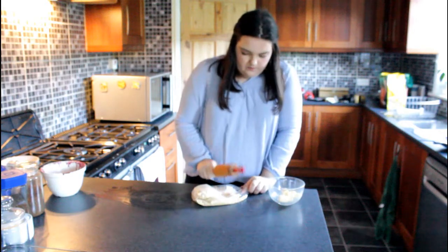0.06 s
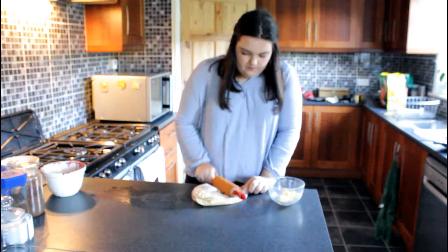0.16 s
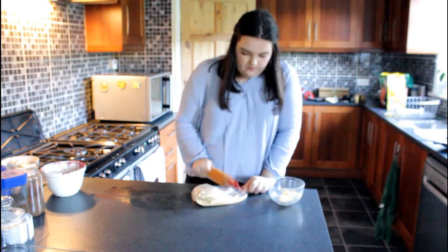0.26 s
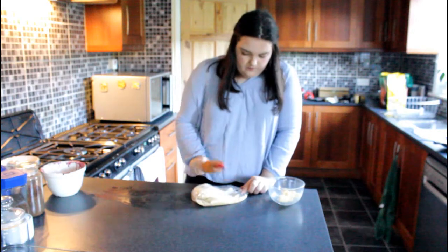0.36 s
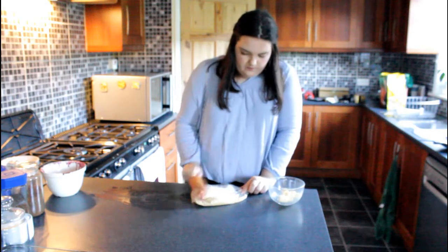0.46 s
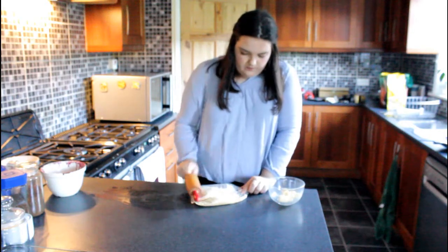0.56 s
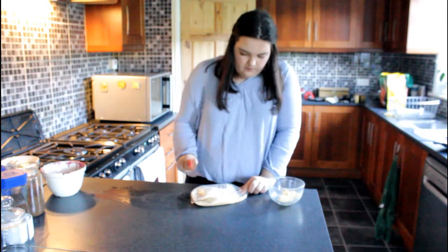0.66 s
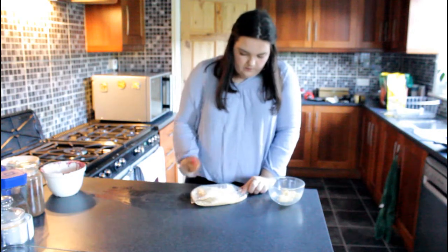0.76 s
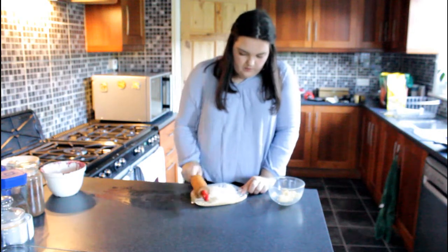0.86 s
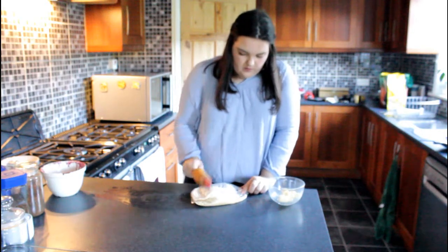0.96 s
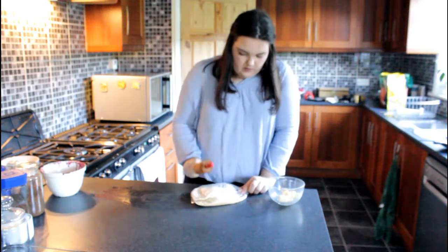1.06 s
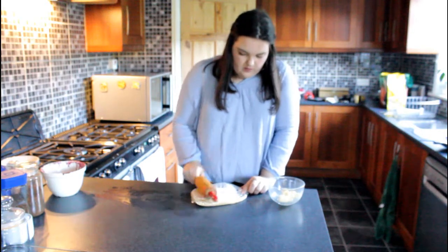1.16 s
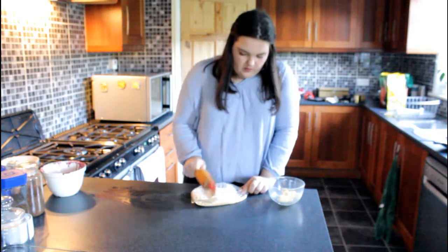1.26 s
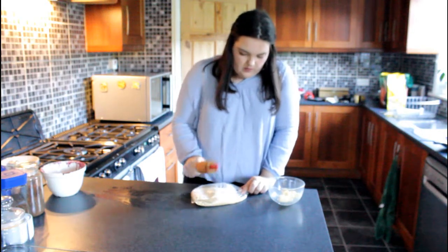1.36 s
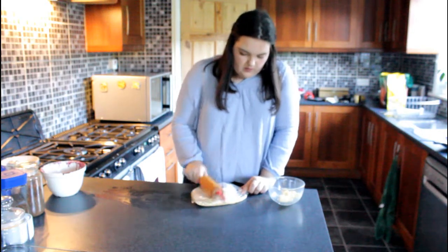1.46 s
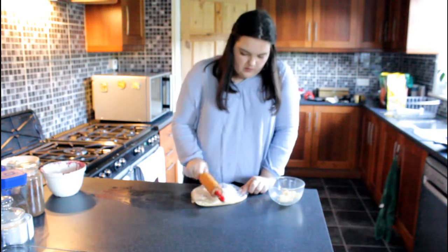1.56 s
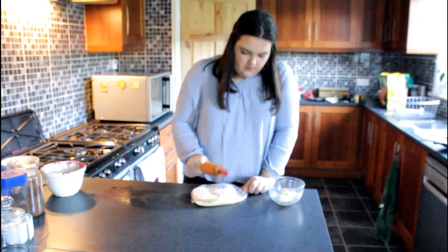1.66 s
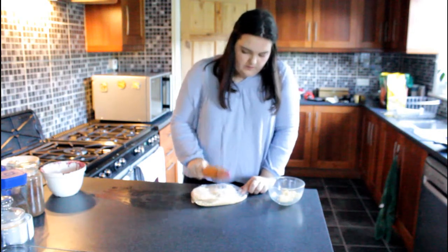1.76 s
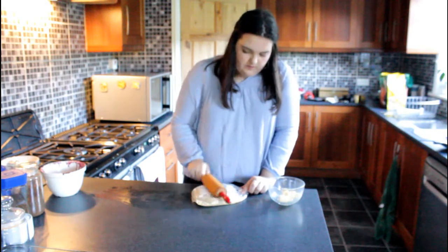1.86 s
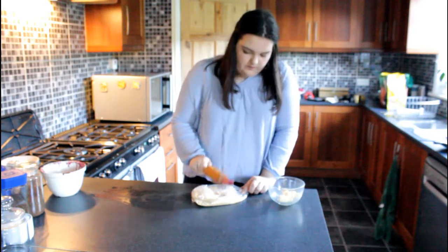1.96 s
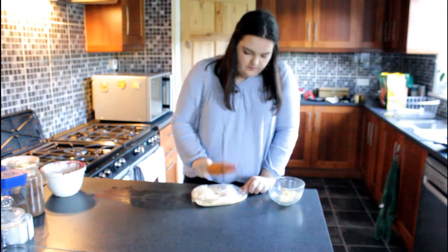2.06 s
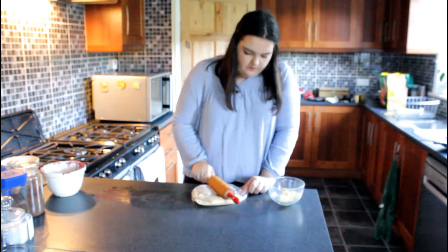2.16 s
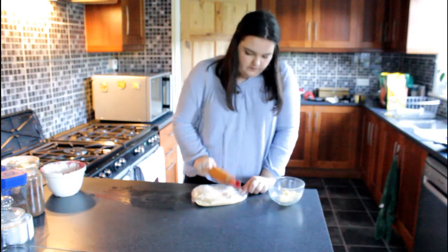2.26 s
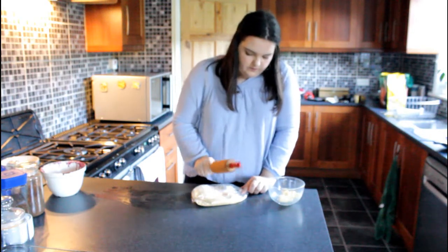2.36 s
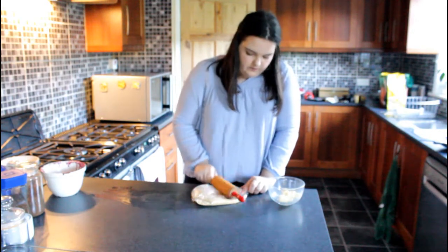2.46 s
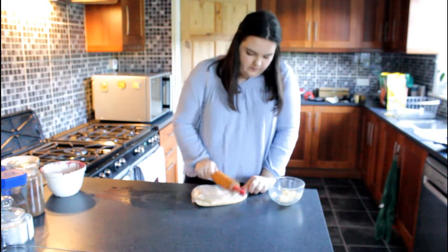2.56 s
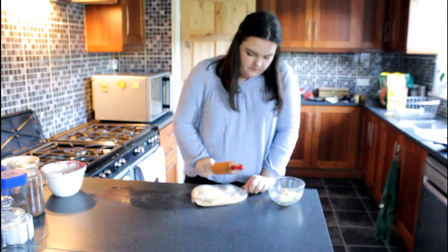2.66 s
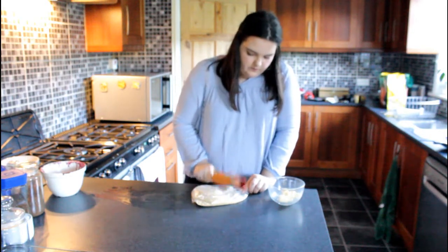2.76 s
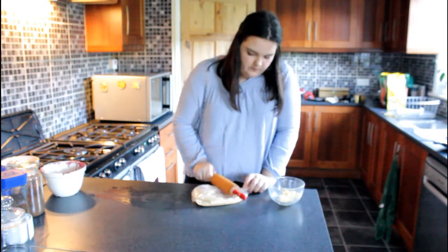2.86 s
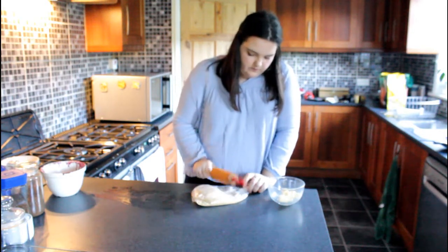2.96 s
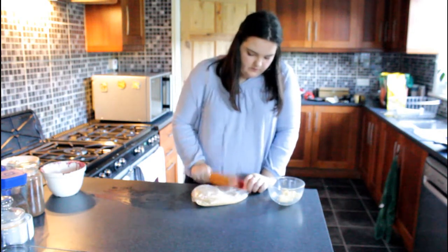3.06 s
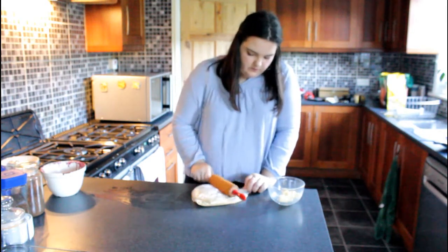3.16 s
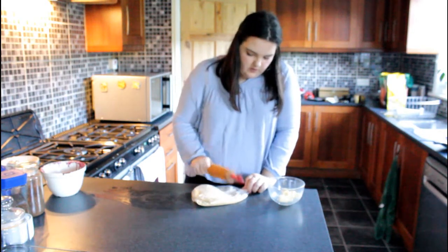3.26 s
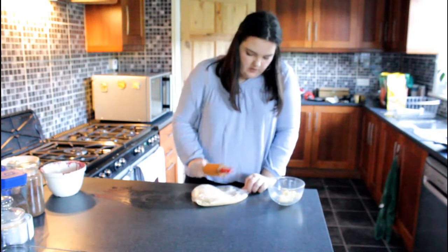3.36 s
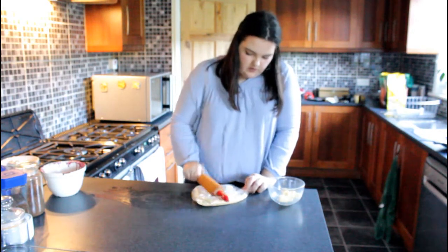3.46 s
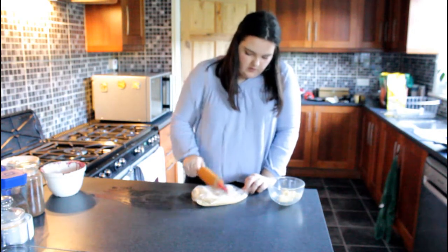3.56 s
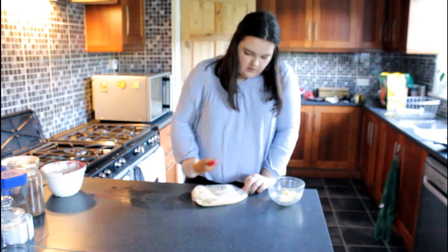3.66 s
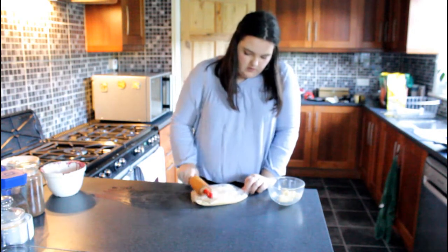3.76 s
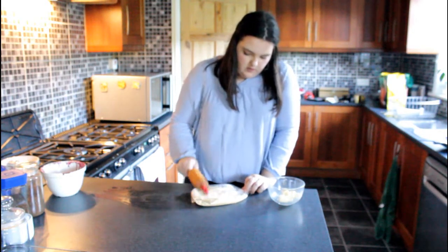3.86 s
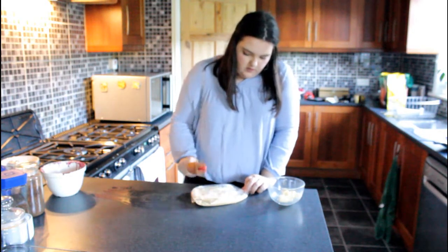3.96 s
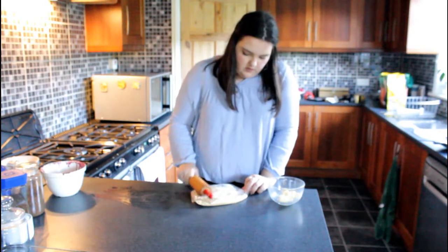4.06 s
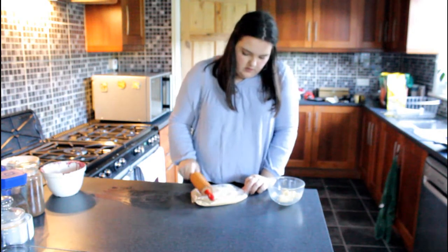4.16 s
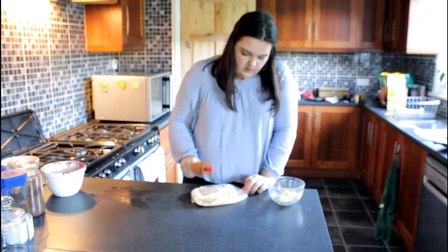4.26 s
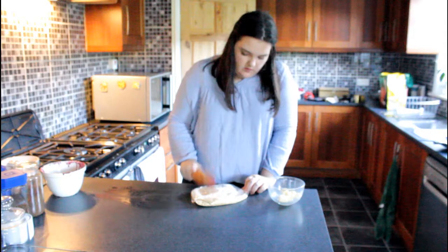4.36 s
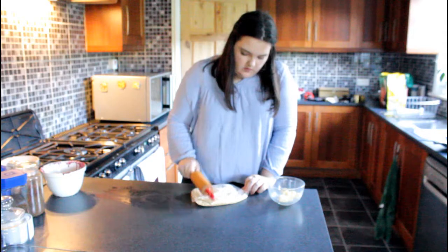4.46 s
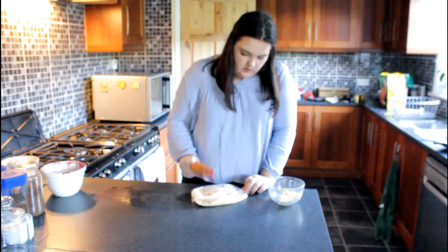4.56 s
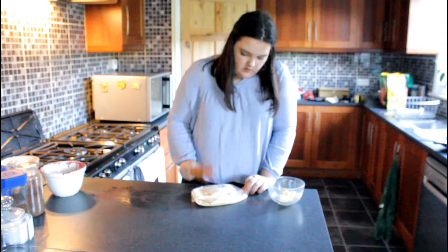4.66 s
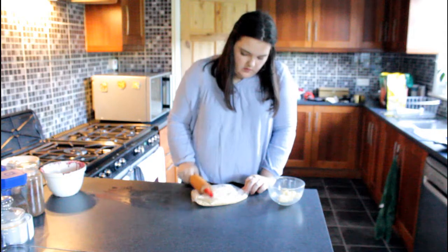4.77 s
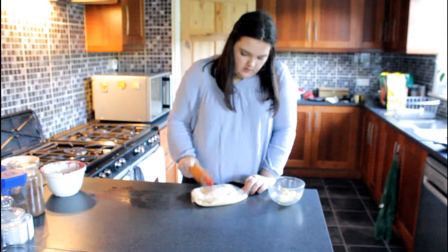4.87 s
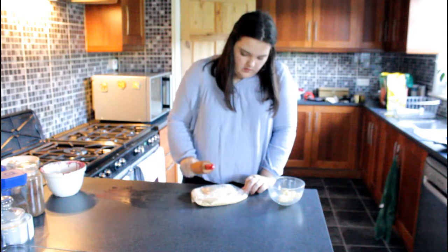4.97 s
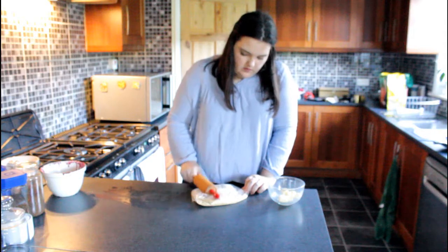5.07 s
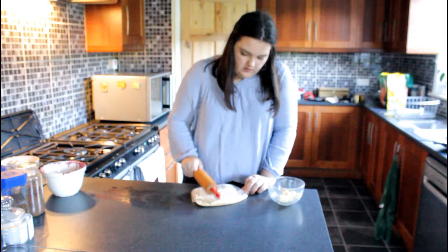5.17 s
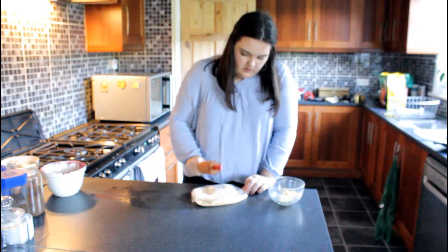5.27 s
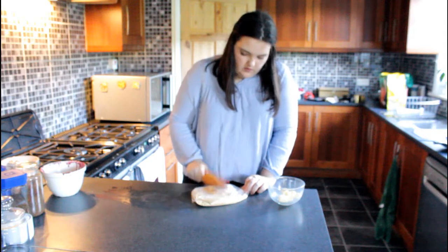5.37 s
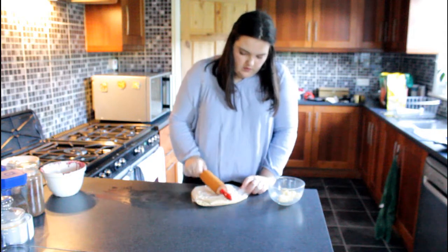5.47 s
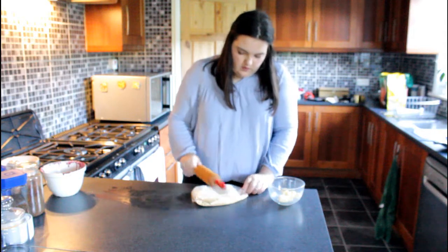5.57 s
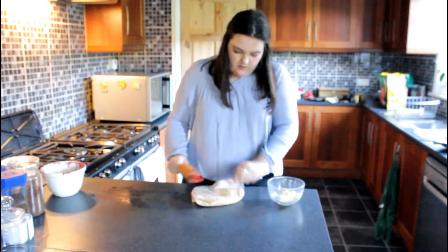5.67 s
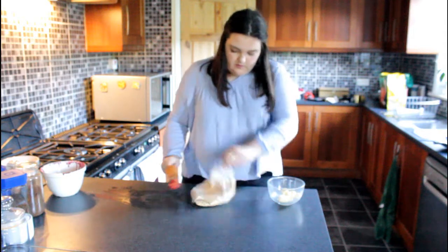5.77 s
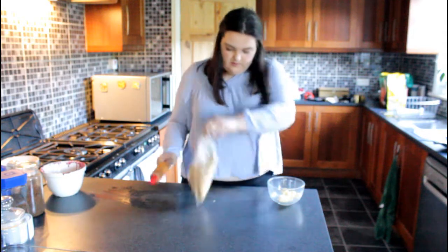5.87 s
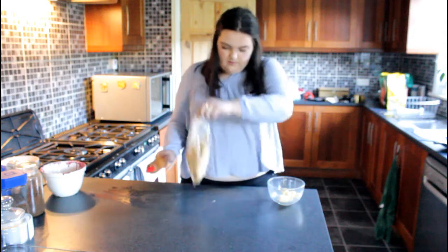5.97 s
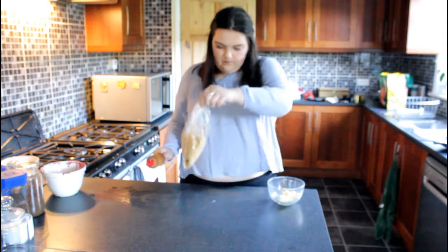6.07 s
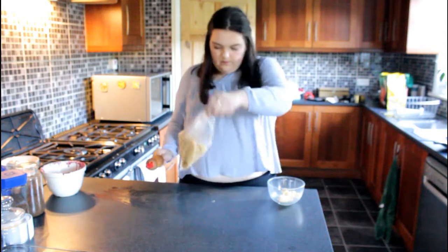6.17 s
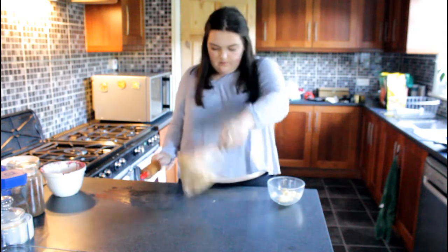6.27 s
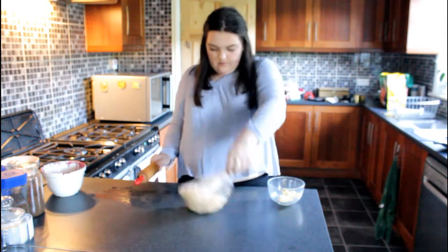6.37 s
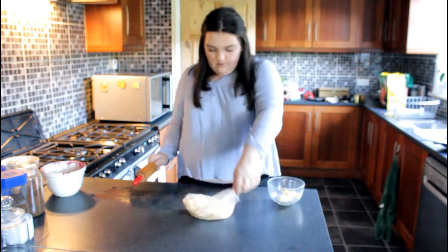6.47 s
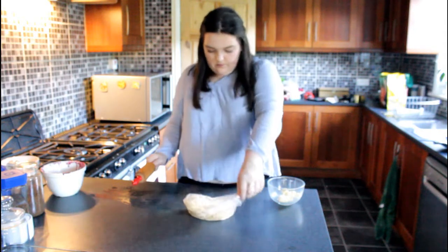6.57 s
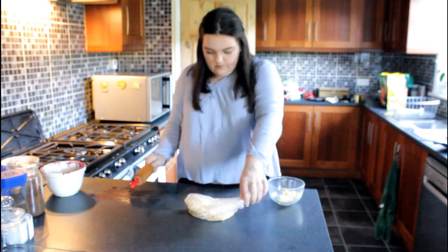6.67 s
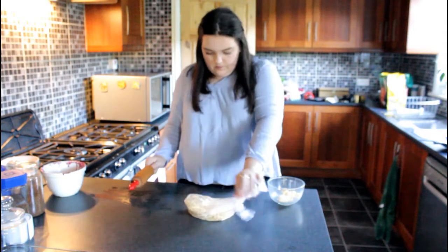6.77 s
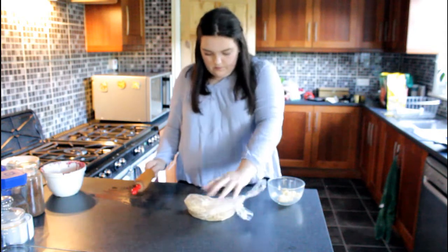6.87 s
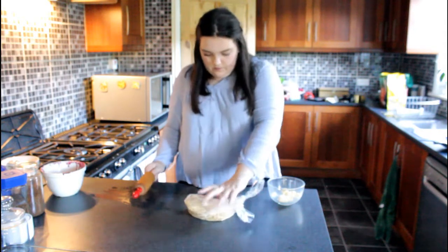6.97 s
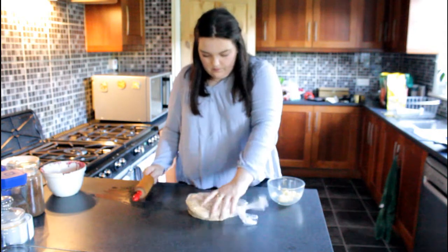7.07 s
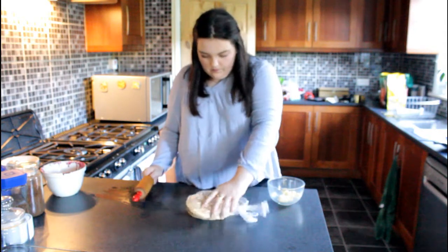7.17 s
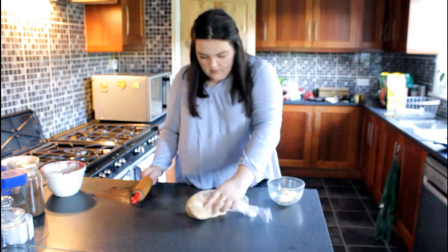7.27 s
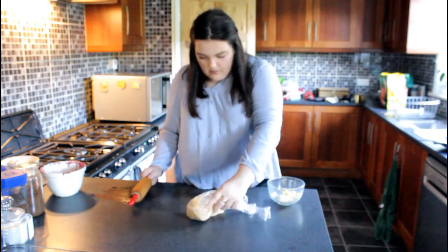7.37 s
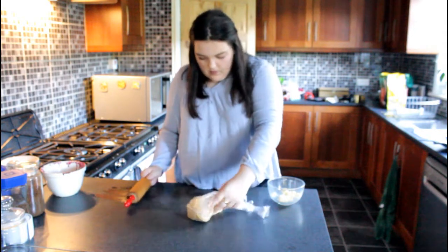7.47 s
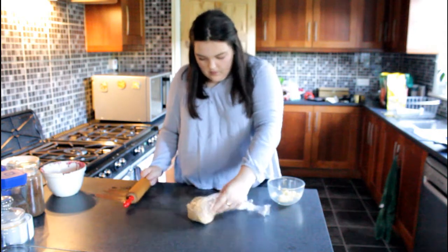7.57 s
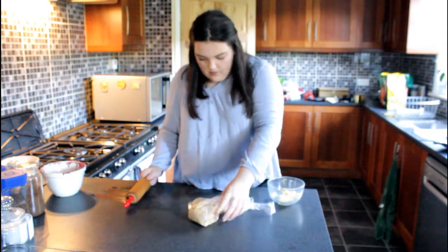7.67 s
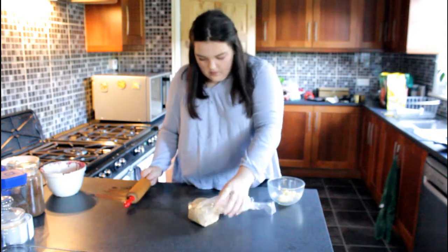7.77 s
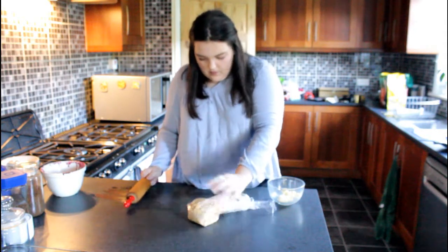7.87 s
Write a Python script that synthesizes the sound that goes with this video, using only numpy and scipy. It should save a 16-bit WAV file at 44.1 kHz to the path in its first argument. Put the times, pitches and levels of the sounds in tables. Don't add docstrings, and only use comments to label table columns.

```python
import sys
import numpy as np
from scipy import signal
from scipy.fft import rfft, irfft
from scipy.io import wavfile
from scipy.ndimage import uniform_filter1d

SR = 44100
rng = np.random.default_rng(int(sys.argv[2]) if len(sys.argv) > 2 else 0)


def materialize(psi):
    bounded = np.clip(np.atleast_2d(psi).T, -1, 1)
    quanta = np.round(bounded * 32767).astype(np.int16)
    wavfile.write(sys.argv[1], SR, quanta)


def volts(x):
    e = np.asarray(x, float) / 20
    return 10 ** e


N = 349272
LEAD = SR // 4
LENGTH = N + LEAD
TIME = (np.arange(LENGTH) - LEAD) / SR

# peak t/s, crack level/dB, thud level/dB, film level/dB, squeeze/ms
BLOWS = [(0.2591, -31.5, -40, -31.5, 19.8), (0.594, -29, -60, -29, 16.8), (0.9336, -26.5, -51, -29, 3.4),
         (1.2702, -30, -51.5, -31, 15.3), (1.5916, -27.5, -52, -29, 12.3), (1.9143, -26.5, -45.5, -32, 9.6),
         (2.2539, -30.5, -41.5, -31.5, 14.5), (2.5744, -27.5, -32, -31, 13), (2.897, -30, -32, -34, 11.5),
         (3.2139, -29.5, -30, -37, 10.4), (3.5389, -28.5, -36.5, -34, 22.7),
         (3.8635, -27, -46, -30.5, 19.3), (4.1817, -28, -37.5, -34, 6.4), (4.4965, -29.5, -54, -33, 8.8),
         (4.8292, -27.5, -33, -29, 6.9), (5.1599, -29, -41, -31, 11.5), (5.4848, -28.5, -45.5, -31, 17.6)]
EARLIER_BLOW = [
    (-0.089, -26, -37.5, -28.5, 15),
]
BAG_DROP = [
    (6.441, -37, -105, -32, 17),
]
# t/s, level/dB
BREAKS = [
    (.9336, -30),
    (1.2702, -41),
    (1.9143, -32),
    (4.182, -29),
    (4.4963, -31.5),
    (4.827, -35),
    (5.1575, -37),
]
# t/s, level/dB
BOWL_JOLTS = [
    (2.575, -50),
    (2.897, -48),
    (3.213, -46),
    (4.83, -53),
]
# t/s, level/dB
LID_LANDINGS = [
    (0.1502, -49),
    (0.7983, -52),
    (1.161, -52),
    (1.8132, -45),
    (2.132, -45.5),
    (3.752, -34),
    (4.08, -40.5),
    (4.389, -49),
    (4.7085, -42),
]
# t/s, level/dB
PIN_TAPS = [
    (7.624, -31),
    (7.641, -32),
]
# t/s, level/dB
CREASES = [(2.809, -47.5), (2.8399, -28.5), (3.1143, -32.5), (3.1843, -33.5), (6.2058, -38), (6.2372, -35),
           (6.2612, -32), (6.327, -33), (6.9296, -36), (7.0439, -44), (7.0883, -38), (7.1044, -29),
           (7.3255, -27), (7.332, -31), (7.379, -31), (7.4, -30), (7.42, -28), (7.5194, -33), (7.54, -33),
           (7.7154, -29), (7.7817, -30), (7.792, -33), (7.867, -35)]
# peak t/s, level/dB, rise/ms, fall/ms
HANDLING = [(5.56, -37.5, 35, 46), (5.66, -36.5, 40, 128), (5.758, -44, 35, 90), (5.83, -33.5, 32, 67),
            (5.91, -37.5, 77, 62), (5.969, -29.5, 41, 74), (6.28, -54, 110, 270), (6.451, -27.5, 21, 97),
            (6.8, -51, 96, 61), (7.1, -41, 39, 260), (7.18, -43.5, 124, 43), (7.33, -42, 68, 47),
            (7.44, -54, 84, 110), (7.55, -59, 31, 60), (7.721, -42.5, 76, 62), (7.79, -51, 25, 22),
            (7.89, -47.5, 39, 16.6)]
# peak t/s, level/dB, rise/ms, fall/ms
SHIFTS = [
    (1.2, -85, 400, 60),
    (2.2, -80, 400, 60),
    (2.7, -52.5, 76, 51),
    (2.88, -50, 94, 20),
    (3.15, -52.5, 270, 150),
    (3.64, -41.5, 73, 36),
    (4.1, -78, 450, 60),
    (4.8, -84, 270, 100),
    (5.45, -67, 180, 100),
]

# f/Hz, width/Hz, level/dB
WORKTOP_MODES = [(229, 7.5, -10.5), (265.5, 29, 9), (342.3, 25, 3), (420, 110, -16)]
# f/Hz, width/Hz, level/dB
PIN_MODES = [(547, 108, 2), (670, 13.3, -3.5), (786, 68, 0.5), (902, 37, 0.5), (992.4, 120, -3),
             (1082, 45, -8.5), (1178, 270, 2.5)]
# f/Hz, width/Hz, level/dB
LID_MODES = [(895, 530, -1), (1540, 550, 1), (2050, 240, 3.5), (2310, 520, 0), (2970, 180, -7.5),
             (3520, 250, -9.5)]
# f/Hz, width/Hz, level/dB
TAP_MODES = [(369, 17, -2.5), (465, 47, 0.5), (628, 52, 0), (770, 150, 2), (990, 250, 2.5)]
# f/Hz, width/Hz, level/dB
SNAP_MODES = [(1490, 1000, -5.5), (3240, 3100, -6.5), (8360, 12000, -15)]
# f/Hz, width/Hz, level/dB
BOWL_MODES = [(1060, 9, 0), (1085, 16, -4), (1120, 14, -5)]
# f/Hz, level/dB, T60/s, lag/ms
CABINET_MODES = [(65.2, -15.5, 0.04, 49), (62.5, -35, 0.92, 47), (71.3, -34, 0.54, 53),
                 (111.9, -21.5, 0.65, 35), (119.5, -29, 0.97, 66), (138, -5.5, 0.16, 4.6),
                 (168.8, -14, 0.36, 20), (216.6, -20.5, 0.7, 36)]

# f/Hz, level/dB
CRUMB_SPECTRUM = [(200, -79), (600, -11.5), (1100, -0.5), (1500, 1), (2000, 2.5), (3200, 0.5), (4500, -6.5),
                  (6000, -23), (8000, -14.5)]
# f/Hz, level/dB
FILM_SPECTRUM = [(800, -60), (2500, -14), (4500, 1), (5700, 0), (7500, 0.5), (10000, -2.5), (13000, -10.5),
                 (16000, -2)]
# f/Hz, level/dB
BAG_SPECTRUM = [(70, -52), (150, -39), (330, -10.5), (550, -8.5), (1200, -1.5), (2200, -1), (4000, -1.5),
                (5500, -6.5), (8000, -35.5)]
# f/Hz, level/dB
HUSH_SPECTRUM = [(25, -24), (200, 3.5), (370, 8), (800, 4), (2200, 1.5), (9500, -12), (16000, -16)]
# f/Hz, T60/s
ROOM_T60 = [(125, 0.68), (250, 0.65), (500, 0.25), (1000, 0.47), (2000, 0.36), (4000, 0.48), (8000, 0.25),
            (14000, 0.033)]
# f/Hz, level/dB
MIC_RESPONSE = [(20, -14), (60, 0), (9500, -1), (11000, -4), (12500, -8.5), (14000, -16.5), (15300, -26),
                (16000, -64)]

IMPACTS = np.transpose(EARLIER_BLOW + BLOWS + BAG_DROP)
IMPACT_S, CRACK_DB, THUD_DB, FILM_DB, SQUEEZE_MS = IMPACTS
RISE_DB = 17


def unit(x):
    return x / np.sqrt(np.mean(x ** 2))


def colour(x, table):
    hz, db = np.transpose(table)
    grid = np.fft.rfftfreq(2048, 1 / SR)
    log_gain = np.interp(np.log(grid + 1), np.log(hz), db) * np.log(10) / 20
    cepstrum = irfft(log_gain)
    middle = len(cepstrum) // 2
    cepstrum[1:middle] *= 2
    cepstrum[middle + 1:] = 0
    response = irfft(np.exp(rfft(cepstrum)))
    return signal.fftconvolve(x, response / np.linalg.norm(response))[:len(x)]


def body(x, table):
    t = np.arange(SR // 4) / SR
    response = np.zeros(len(t))
    for k, (hz, width, db) in enumerate(table):
        decay = np.sqrt(width) * np.exp(-np.pi * width * t)
        response += (-1) ** k * volts(db) * decay * np.sin(2 * np.pi * hz * t)
    return signal.fftconvolve(x, response / np.linalg.norm(response))[:len(x)]


def grains(per_s, spread_db):
    chance = rng.random((3, LENGTH))
    size = volts(-spread_db * np.log(1 - chance[1])) * np.sign(chance[2] - 0.5)
    return unit(size * (chance[0] < per_s / SR))


def swell(s, db, rise_ms, fall_ms):
    out = np.zeros(LENGTH)
    for at, gain, rise, fall in np.broadcast(s, volts(db), rise_ms, fall_ms):
        ms = 1000 * (TIME - at)
        near = slice(*np.searchsorted(ms, [-rise, 7 * fall]))
        growth = volts(RISE_DB * np.minimum(ms[near], 0) / rise)
        decay = np.exp(-ms[near] / fall)
        out[near] += gain * np.minimum(growth, decay)
    return out


def bursts(carrier, s, db, rise_ms, fall_ms):
    out = np.zeros(LENGTH)
    for at, gain, rise, fall in np.broadcast(s, volts(db), rise_ms, fall_ms):
        burst = carrier * swell(at, 0, rise, fall)
        out += burst * gain * np.sqrt(SR / 20 / np.sum(burst ** 2))
    return out


def struck(table, s, db, push_ms, lead_ms, shake_ms, shake_db, linger_ms, linger_db):
    noise = rng.standard_normal((2, LENGTH))
    force = bursts(np.ones(LENGTH), s, db, push_ms, push_ms / 2)
    force += bursts(noise[0], s + 0.002, db + shake_db, lead_ms, shake_ms)
    force += bursts(noise[1], s + 0.0094, db + linger_db, 1.6, linger_ms)
    above_push = signal.butter(3, 0.36 * table[0][0], "highpass", fs=SR, output="sos")
    return signal.sosfilt(above_push, body(force, table))


def background_hush():
    return volts(-58.5) * colour(rng.standard_normal(LENGTH), HUSH_SPECTRUM)


def squeezed_bag():
    crumbs = bursts(grains(6400, 1), IMPACT_S, CRACK_DB - 0.5, SQUEEZE_MS, 0.73 + 1.13 * SQUEEZE_MS)
    film = bursts(grains(12000, 1.6), IMPACT_S, FILM_DB - 0.5, SQUEEZE_MS, 1.7 + 0.79 * SQUEEZE_MS)
    film += bursts(grains(6000, 1.8), IMPACT_S + 0.019, FILM_DB - 6.5, 6.4, 61)
    return colour(crumbs, CRUMB_SPECTRUM) + colour(film, FILM_SPECTRUM)


def pin_knock():
    knock_db = -39.5 + 0.6 * (THUD_DB + 39) - 0.3 * SQUEEZE_MS
    return struck(PIN_MODES, IMPACT_S, knock_db, 0.041, 1.1 * SQUEEZE_MS, 25, 12.6, 59.2, 11.8)


def worktop_thud():
    return struck(WORKTOP_MODES, IMPACT_S - 0.002, THUD_DB - 8, 0.7, 0.6 * SQUEEZE_MS, 10, -6, 64, 3)


def jar_rattle():
    return struck(LID_MODES, IMPACT_S + 0.00353, CRACK_DB - 21, 0.26, 1.2, 6.3, 2.4, 83, 12)


def cabinet_boom():
    s = np.append(IMPACT_S[:-1], PIN_TAPS[0][0])
    db = np.append(-26 + 0.27 * (THUD_DB[:-1] + 32), -55)
    out = np.zeros(LENGTH)
    latest = np.maximum(np.searchsorted(s, TIME) - 1, 0)
    last = np.searchsorted(TIME, s)[latest]
    for k, (hz, mode_db, t60, lag) in enumerate(CABINET_MODES):
        lag = min(lag, 90)
        wobble = uniform_filter1d(rng.standard_normal(LENGTH), SR // 20)
        phase = 2 * np.pi * np.cumsum(hz * (1 + 0.015 * unit(wobble))) / SR
        ring = swell(s + lag / 1000, db + mode_db, lag, 1000 * t60 / np.log(1000))
        smooth_ring = uniform_filter1d(ring, int(SR / hz))
        out += (-1) ** k * np.sin(phase - phase[last]) * smooth_ring
    return signal.sosfilt(signal.butter(2, 400, fs=SR, output="sos"), out)


def lid_clacks():
    clacks = struck(LID_MODES, *np.transpose(LID_LANDINGS), 0.05, 0.9, 5, 9.5, 59, 12.7)
    return volts(-18.5) * clacks


def biscuit_breaks():
    snap = bursts(rng.standard_normal(LENGTH), *np.transpose(BREAKS), 0.5, 0.4)
    snap += np.roll(snap, int(3.6 * SR / 1000)) / 2
    highpass = signal.butter(2, 500, "highpass", fs=SR, output="sos")
    return signal.sosfilt(highpass, body(snap, SNAP_MODES))


def rustle():
    effort = swell(*np.transpose(HANDLING + SHIFTS)) + volts(-80)
    drift = uniform_filter1d(rng.standard_normal(LENGTH), SR // 40)
    flurry = volts(0.96 * unit(drift))
    crinkle = grains(6000, 1.47) * flurry * effort
    ticks = volts(-13) * grains(100, 2) * np.minimum(effort, volts(-42))
    crispness = (effort / volts(-46)) ** -0.1822 * volts(-1.5)
    rubbing = colour(crinkle * volts(-2.5), BAG_SPECTRUM)
    return rubbing + colour((crinkle + ticks) * crispness, FILM_SPECTRUM)


def bowl_ring():
    return struck(BOWL_MODES, *np.transpose(BOWL_JOLTS), 0.15, 1.6, 7.4, -2, 80, 11)


def crease_snaps():
    snaps = bursts(rng.standard_normal(LENGTH), *np.transpose(CREASES), 0.23, 1)
    return volts(-22) * colour(snaps, FILM_SPECTRUM)


def pin_set_down():
    return volts(-24) * struck(TAP_MODES, *np.transpose(PIN_TAPS), 0.55, 0.82, 13, 8.1, 65, 5.8)


def kitchen(near):
    noise, tail = rfft(rng.standard_normal(LENGTH)), 0
    octaves = np.log2(np.fft.rfftfreq(LENGTH, 1 / SR) + 1)
    late = np.roll(near, int(4 * SR / 1000))
    room_hz, room_t60 = np.transpose(ROOM_T60)
    for hz in 160 * 2 ** np.arange(0, 6.8, 1 / 4):
        band = signal.butter(2, [hz * 2 ** -0.2, hz * 2 ** 0.2], "bandpass", fs=SR, output="sos")
        t60 = np.interp(np.log(hz), np.log(room_hz), room_t60)
        keep = volts(-120 / (t60 * SR))
        received = signal.sosfilt(band, late) ** 2
        stored = signal.lfilter([1 - keep], [1, -keep], received)
        share = np.cos(np.pi / 2 * np.clip(4 * (octaves - np.log2(hz)), -1, 1))
        tail = tail + np.sqrt(stored) * unit(irfft(noise * share, LENGTH))
    return near + volts(0.5 - 9.5) * tail


def scene():
    bag = squeezed_bag() + biscuit_breaks() + rustle() + crease_snaps()
    solids = pin_knock() + worktop_thud() + jar_rattle() + cabinet_boom()
    solids += lid_clacks() + bowl_ring() + pin_set_down()
    mono = kitchen(bag) + solids + background_hush()
    return np.tile(mono[LEAD:], (2, 1))


def low_pass(x):
    return signal.sosfilt(signal.butter(12, 15750, fs=SR, output="sos"), x)


def record(dry):
    overload = 0.7
    rounded = overload * np.tanh(dry[0] / overload)
    mix = volts(-3) * np.tile(colour(rounded, MIC_RESPONSE), (2, 1))
    return low_pass(mix)


dry = scene()
out = record(dry)
materialize(out)
```